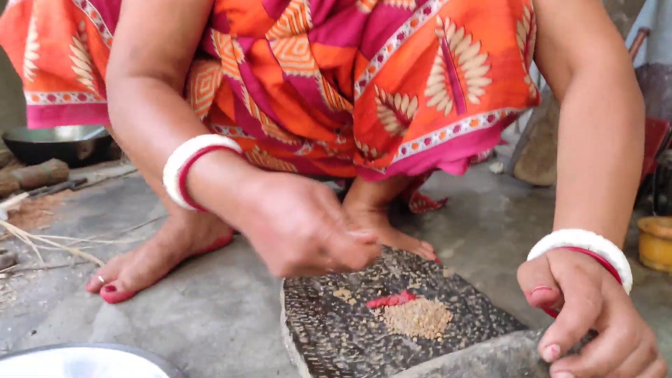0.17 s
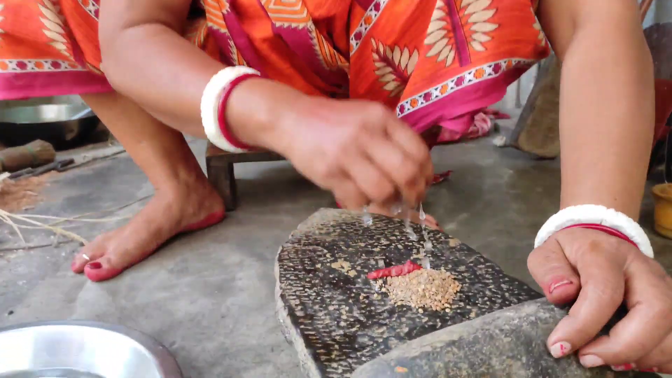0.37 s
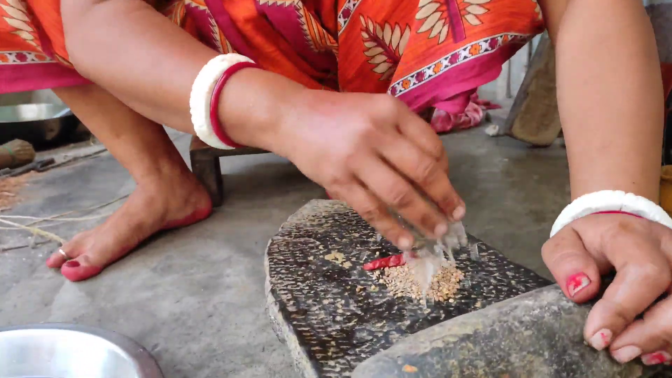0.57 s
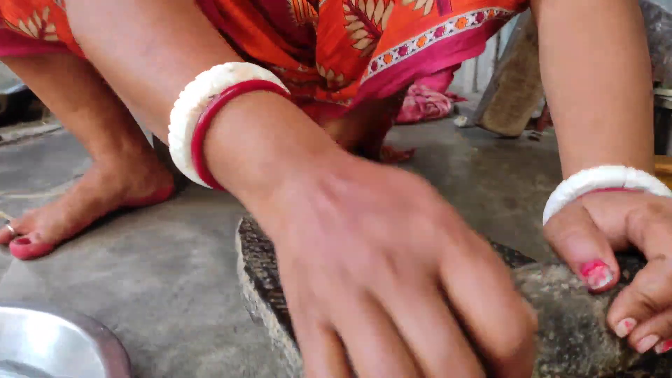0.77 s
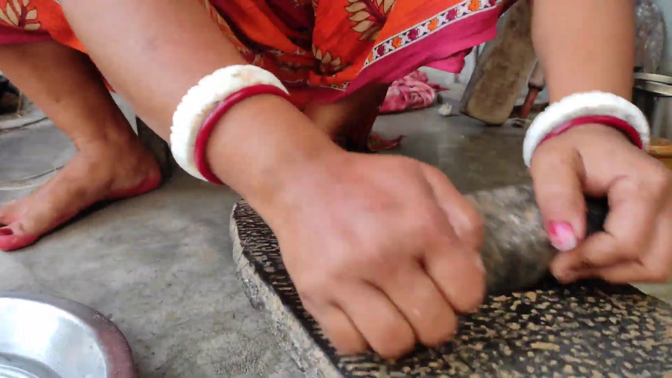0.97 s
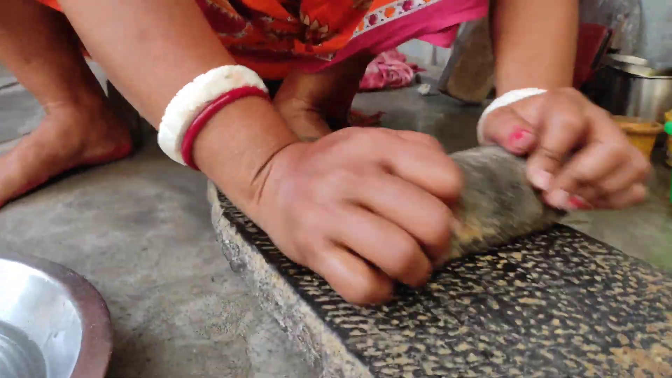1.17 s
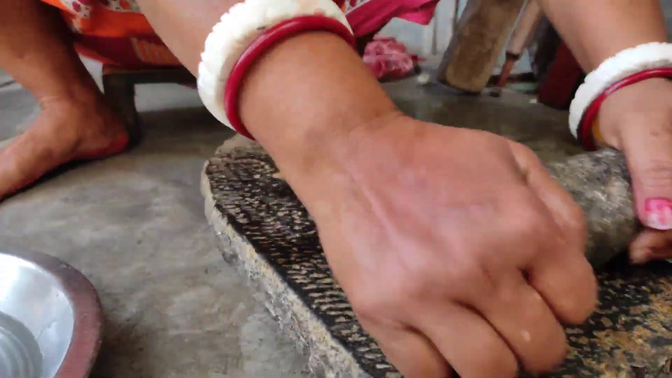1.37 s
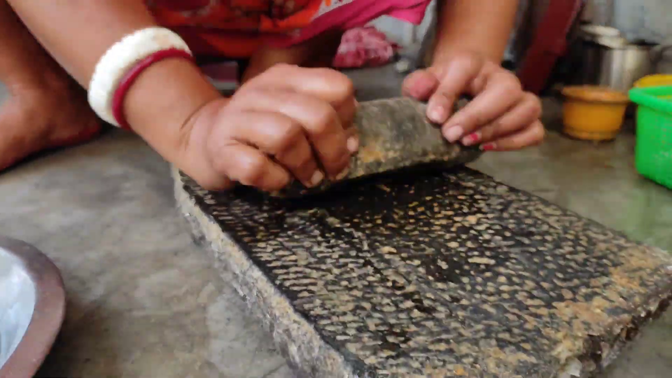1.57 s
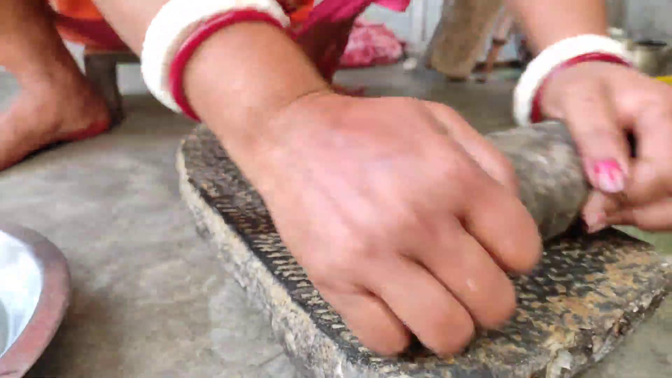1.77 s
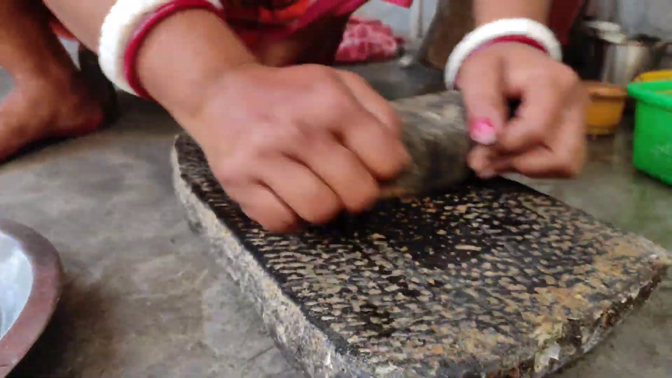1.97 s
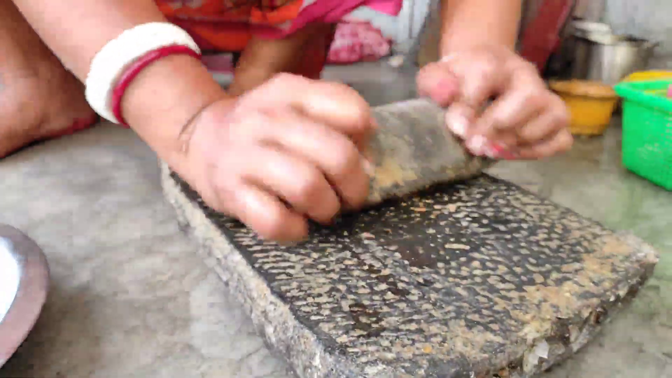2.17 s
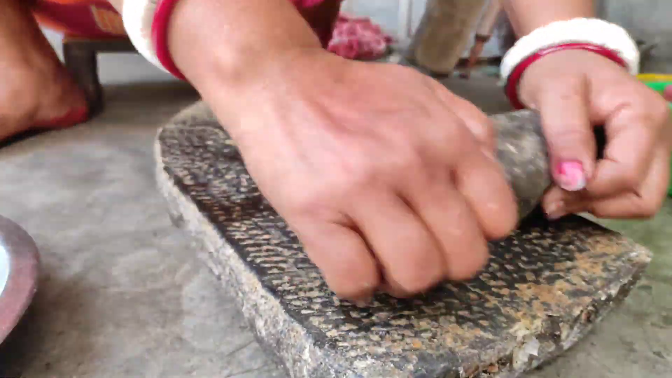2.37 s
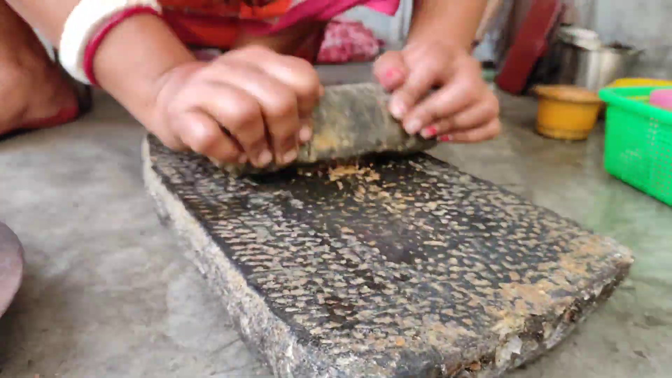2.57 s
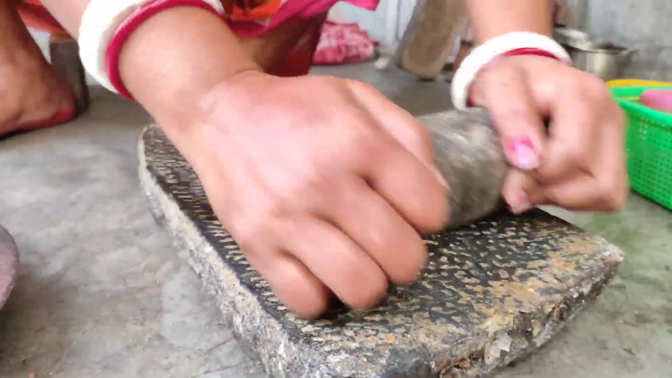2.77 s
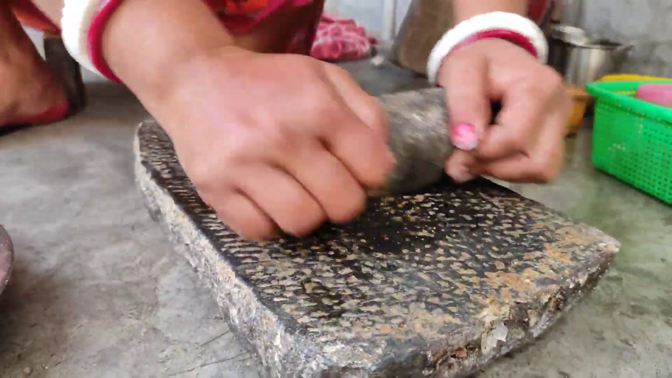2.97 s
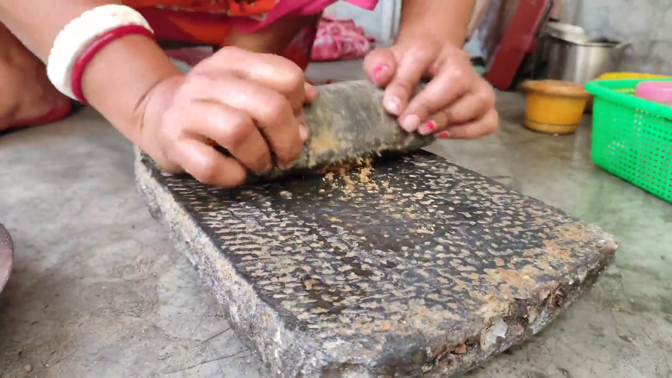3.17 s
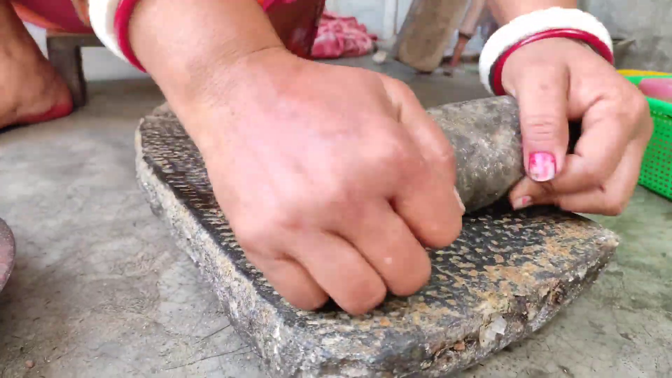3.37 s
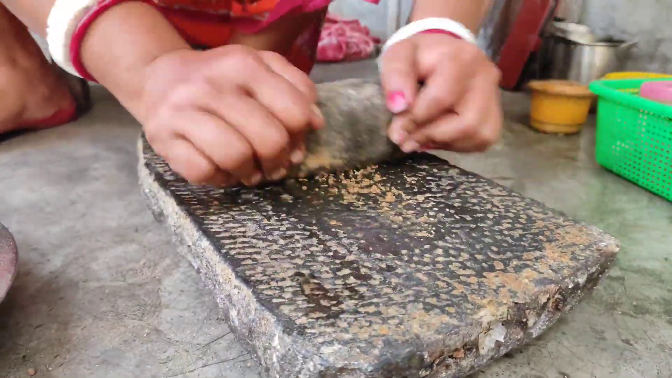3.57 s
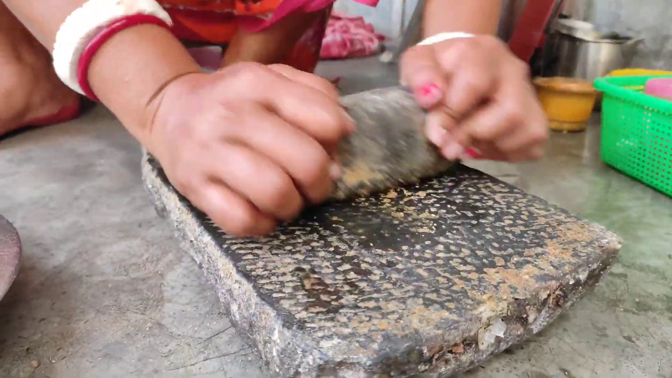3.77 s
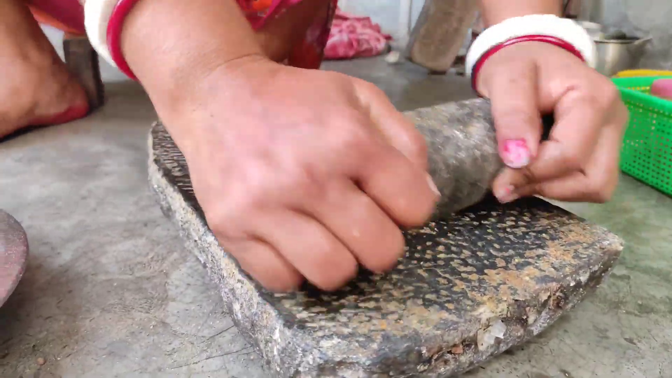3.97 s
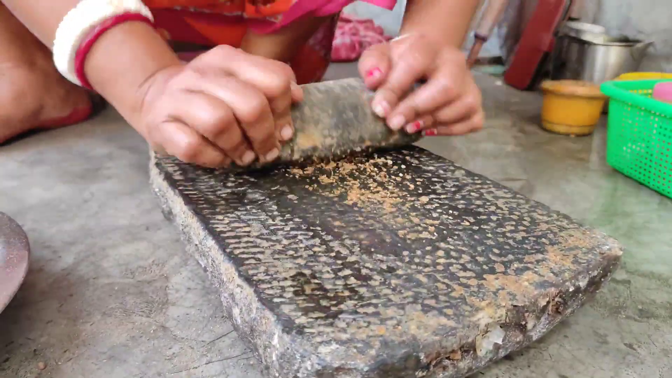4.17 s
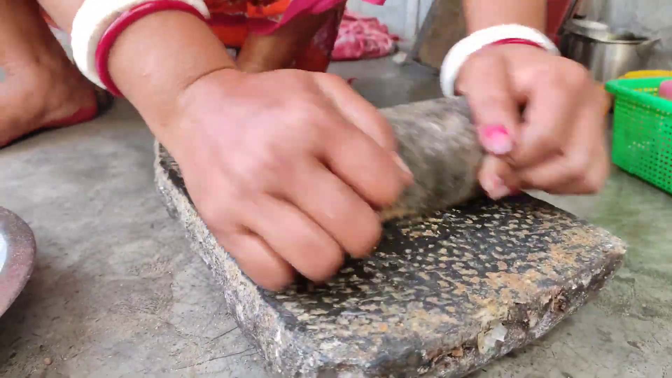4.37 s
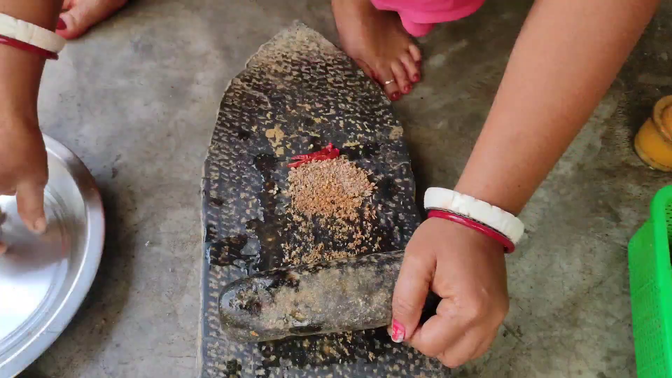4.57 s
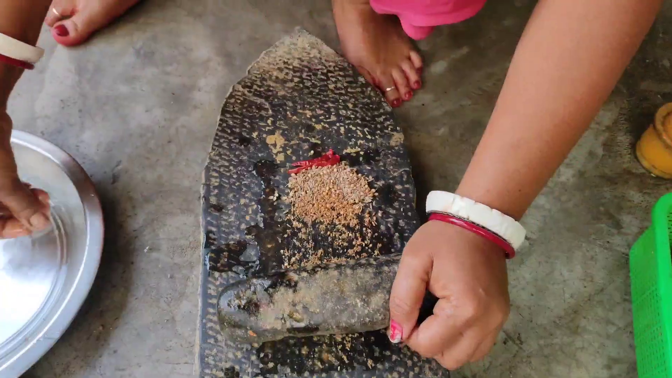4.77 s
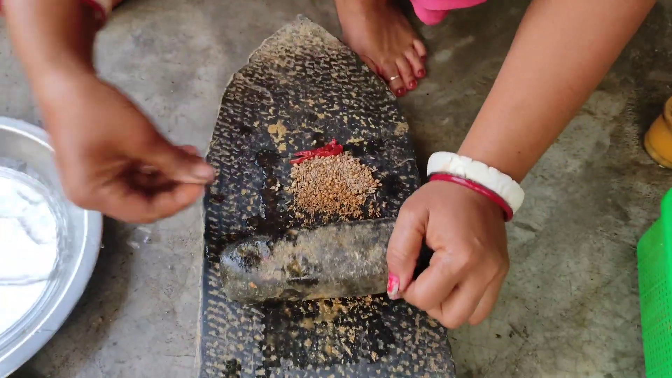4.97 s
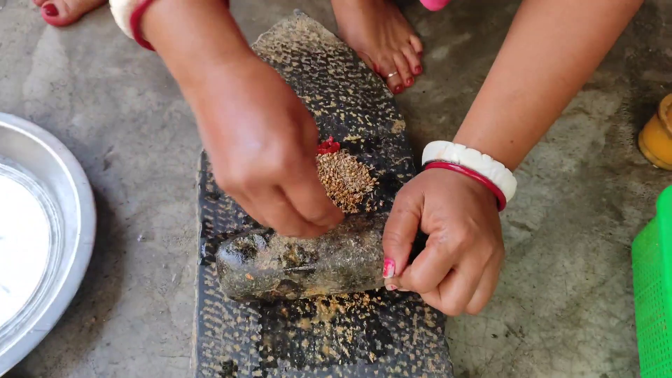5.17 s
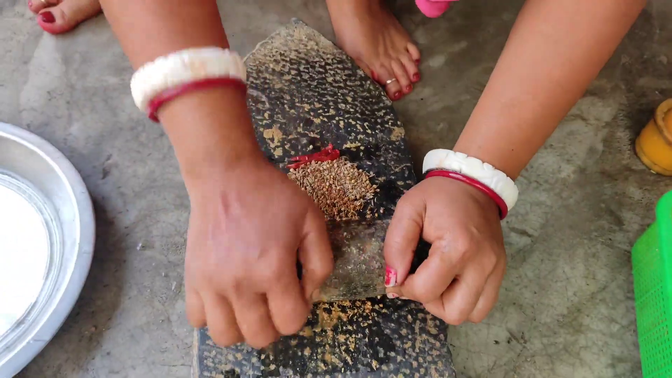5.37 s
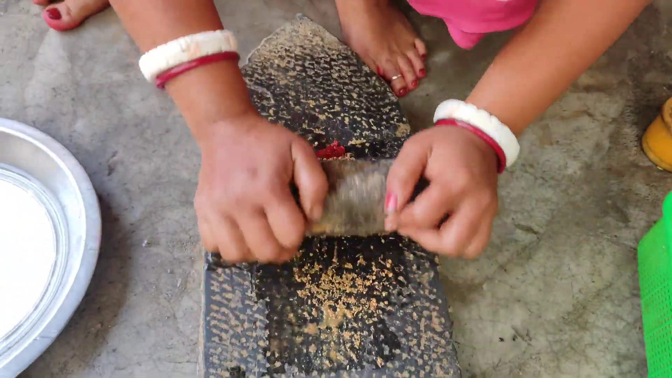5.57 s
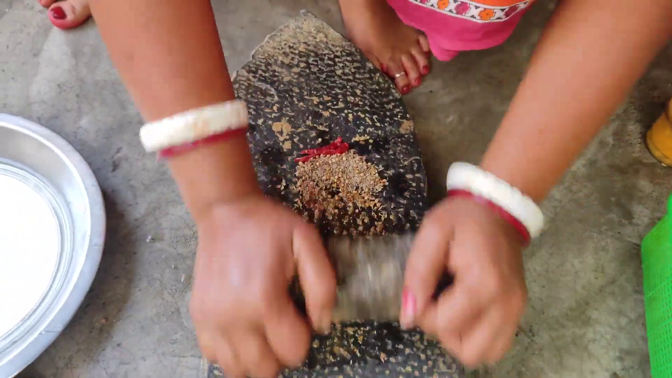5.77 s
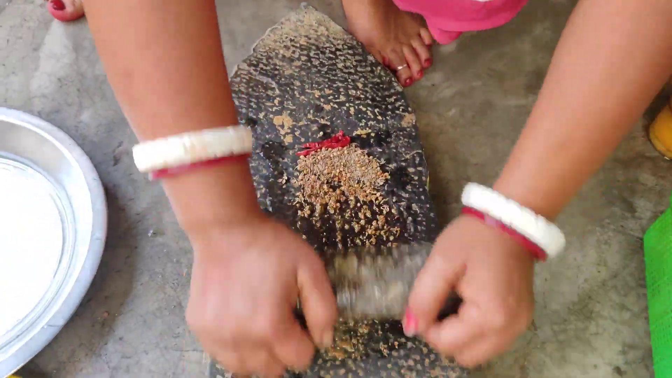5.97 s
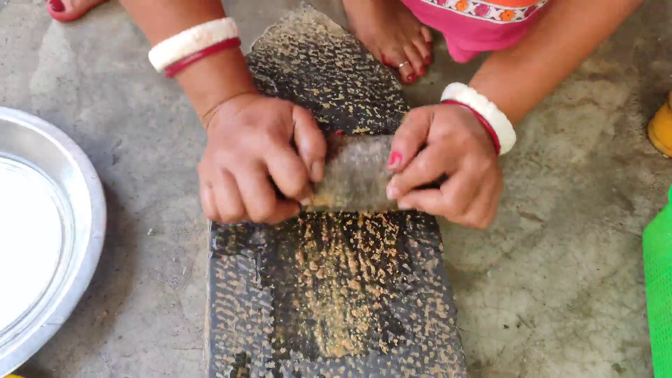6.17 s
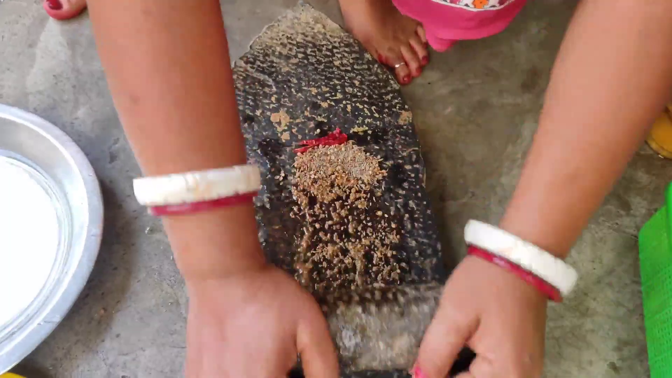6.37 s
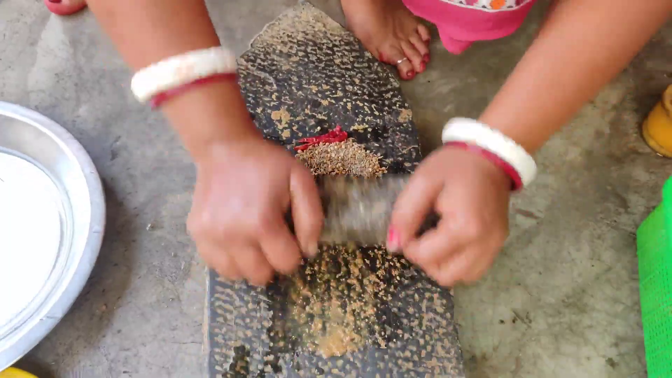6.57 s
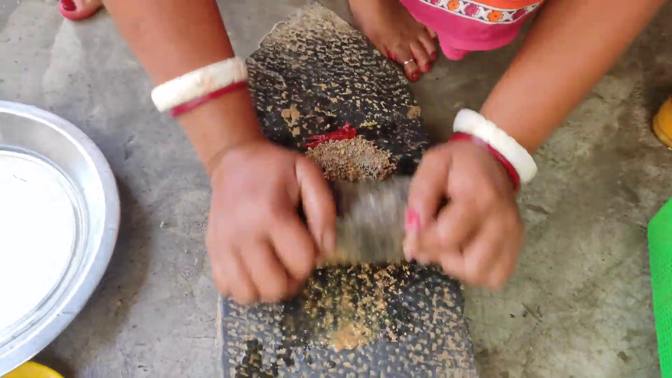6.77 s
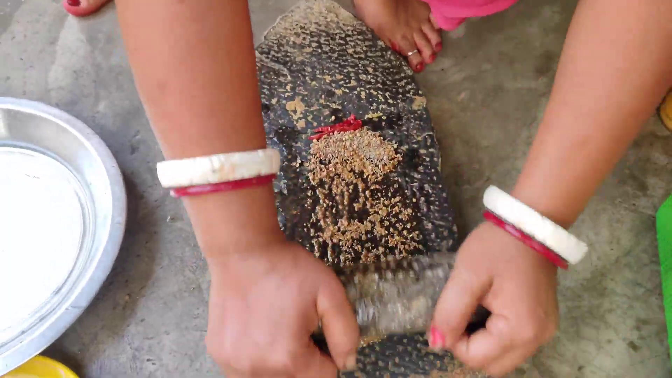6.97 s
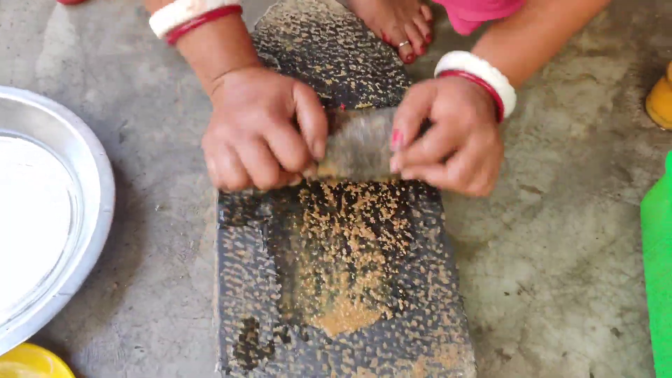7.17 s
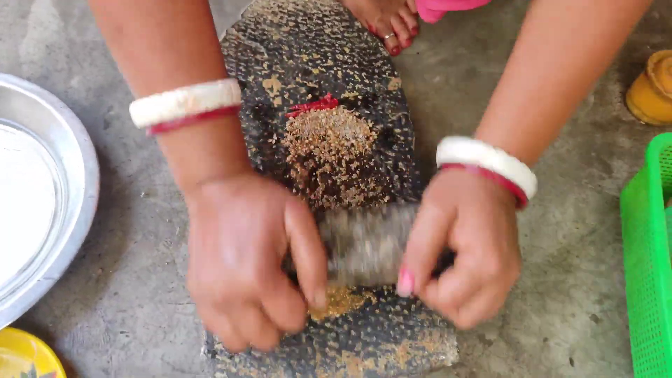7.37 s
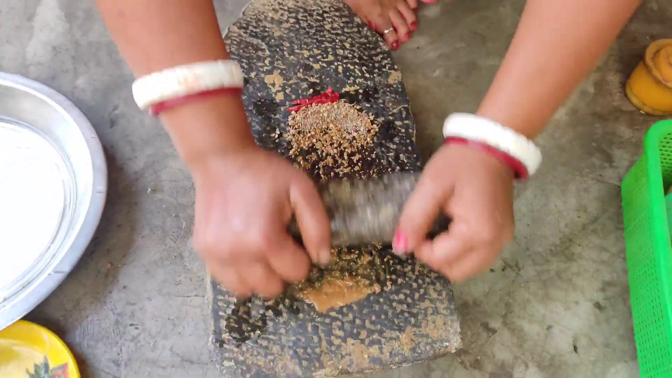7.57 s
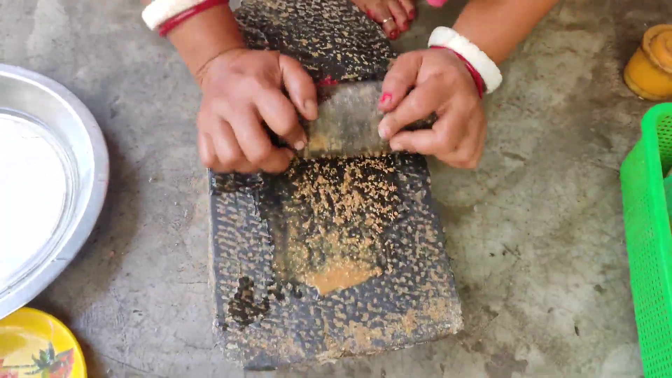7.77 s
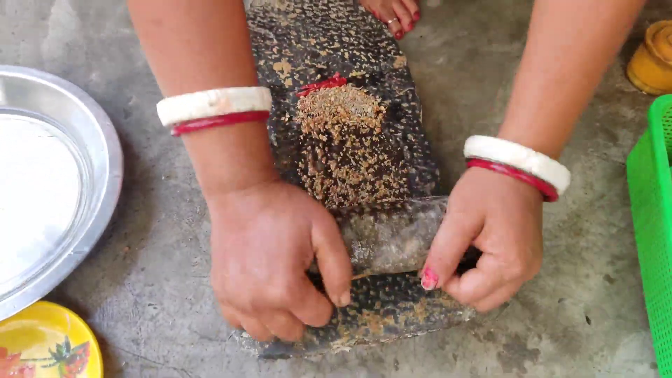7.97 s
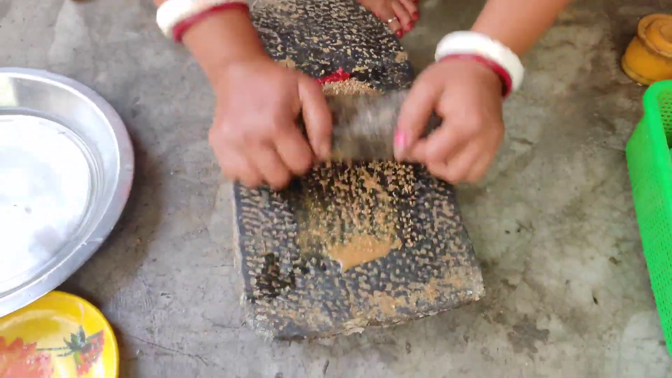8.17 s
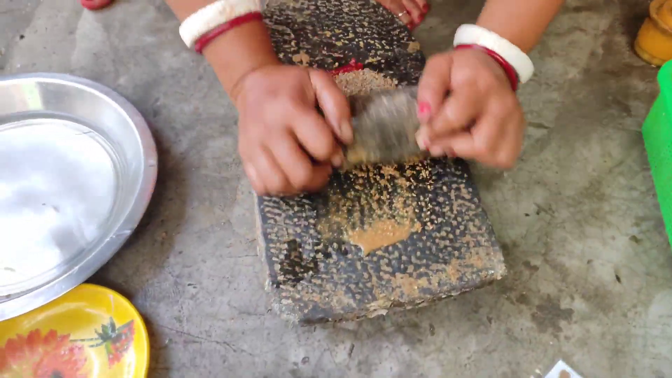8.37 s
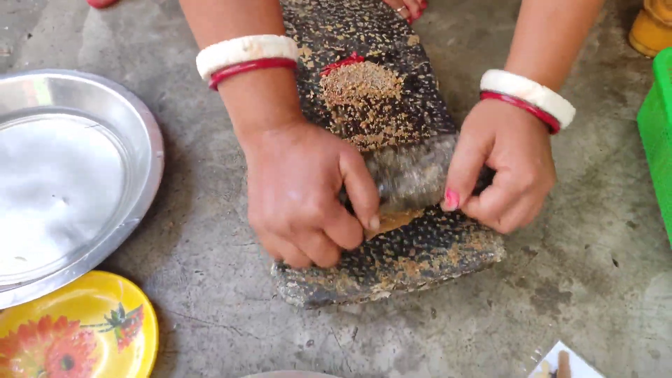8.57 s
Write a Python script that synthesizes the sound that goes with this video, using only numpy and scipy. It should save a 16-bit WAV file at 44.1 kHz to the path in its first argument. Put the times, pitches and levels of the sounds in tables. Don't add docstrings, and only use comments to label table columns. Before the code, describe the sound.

Faint room air and a few small taps fill the first 0.9 s. Then a stone roller begins rubbing over a pitted slab, rattling and rocking with hollow ringing tones near 1.2 s and hard, bright knocks around 1.35-1.45 s. From 1.6 to 4.6 s it goes back and forth, each direction lasting about a quarter second, with clacking at the turns, gritty scraping, crunching husks and sharp seed cracks, strongest near 3.4 and 4.0 s. The dry ringing fades as the knocks soften. At 4.7 s the perspective changes abruptly: quiet, small stone shifts, light water drops, and a sharp plink on a bowl at right at 5.18 s with a faint ring. From 5.55 s to the end, softer, regular grinding hisses and crunches, with crisp seed snaps around 5.86, 6.3, 7.0 and 8.1 s. Close stereo phone pickup, little reverberation.

```python
import sys
import numpy as np
from scipy import signal
from scipy.fft import rfft, irfft, next_fast_len
from scipy.io import wavfile
from scipy.ndimage import uniform_filter1d

SR = 44100
rng = np.random.default_rng(int(sys.argv[2]) if len(sys.argv) > 2 else 0)


def gain_from_db(level_db):
    decades = np.asarray(level_db, float) / 20
    return 10 ** decades


def unload_audio(sound):
    columns = np.transpose(np.atleast_2d(sound))
    steps = np.round(np.clip(columns, -1, 1) * 32767)
    wavfile.write(sys.argv[1], SR, steps.astype(np.int16))


N = 380450
T = np.arange(N) / SR
CUT_S = 4.7


def evened(x):
    return x / np.sqrt(np.mean(x ** 2) + 1e-20)


def read(points, hz):
    point_hz, value = np.transpose(points)
    return np.interp(np.log(hz + 1), np.log(point_hz + 1), value)


def add(mix, s, sound):
    part = mix[round(s * SR):][:len(sound)]
    part += sound[:len(part)]


def placed(sounds):
    out = np.zeros((2, N))
    for s, sound in sounds:
        for path in range(2):
            add(out[path], s, sound[path])
    return out


def ring(modes):
    t, out = T[:5000], 0
    for k, (hz, width_hz, db) in enumerate(modes):
        decay = np.sqrt(width_hz) * np.exp(-np.pi * width_hz * t)
        out = out + (-1) ** k * gain_from_db(db) * decay * np.sin(2 * np.pi * hz * t)
    return out


def rung(x, modes):
    return evened(signal.oaconvolve(x, ring(modes)[None], axes=1)[:, :N])


def colour(x, spectrum):
    n = x.shape[-1]
    return irfft(rfft(x) * gain_from_db(read(spectrum, np.fft.rfftfreq(n, 1 / SR))), n)


def drift(shape, over_hz, over_time):
    patches = rng.standard_normal(shape[::-1]).T
    patches = uniform_filter1d(patches, size=over_hz, axis=0)
    return evened(uniform_filter1d(patches, size=over_time, axis=1))


def room_tone():
    # hz, level_db_per_hz
    air = [(8, 10), (20, -14.5), (60, 0), (130, -14.5), (250, -13.5), (800, -17), (2400, -18),
           (3500, -26.5), (4300, -21), (5000, -14), (6100, -22), (7200, -17), (8300, -35), (14100, -31.5),
           (14500, -67)]
    # hz, extra_db in the first place
    air_first = [(30, -0.5), (120, 3), (300, -1), (600, -3.5), (1000, -0.5), (3000, 2)]
    # hz, left_right_likeness
    likeness = [(60, 0.23), (240, 0.85), (930, -0.065), (3680, 0.00072), (14500, -0.026)]
    # hz, left_minus_right_db
    air_tilt = [(60, -1.5), (240, -1.5), (930, -0.5), (3680, -7), (14500, -7.5)]
    frames, hz = N // 256 + 5, np.fft.rfftfreq(1024, 1 / SR)
    a, b, c, d = rng.standard_normal((frames, 513, 4)).T
    same, left = np.clip(read(likeness, hz), -1, 1)[:, None], a + 1j * b
    z = np.array([left, same * left + np.sqrt(1 - same ** 2) * (c + 1j * d)])
    first = np.arange(frames) * 256 / SR < CUT_S
    level_db = read(air, hz)[:, None] + read(air_first, hz)[:, None] * first
    z *= gain_from_db(level_db + 1.6 * drift((513, frames), over_hz=10, over_time=12))
    z *= gain_from_db(np.array([[.5], [-.5]]) * read(air_tilt, hz))[:, :, None]
    return gain_from_db(-55.5) * evened(signal.istft(z, nperseg=1024, noverlap=768)[1][:, :N])


def burst(db, hz, width_hz, t60_s, snap=.0, order=0, count=1):
    t = T[:6000]
    puff = rng.standard_normal((2, len(t))) * gain_from_db(-60 * t / max(t60_s, 1e-3))
    puff[:, 0] += snap
    for _ in range(count):
        puff = signal.oaconvolve(puff, ring([(hz, width_hz * count ** .5, 0)])[None, :1500], axes=1)
    puff = np.diff(puff, order, append=np.zeros((2, order)))
    return gain_from_db(db) * puff / abs(puff[0]).max()


def taps_and_scuffs():
    # hit_s, peak_db, centre_hz, width_hz, t60_s
    touches = [(0.1475, -32, 5100, 600, 0.09), (0.149, -40, 7200, 500, .05), (0.48, -39, 265, 120, 0.3),
               (.482, -50, 3600, 1800, .5), (.48, -41, 1500, 1800, 0.5), (0.636, -45, 700, 540, 0.35),
               (0.64, -50, 280, 120, .4), (2.199, -37, 240, 46, 0.35), (2.6185, -29, 860, 200, .1),
               (2.6185, -38, 2100, 400, .08), (4.772, -52, 69, 40, 0.25), (4.79, -55, 1200, 150, .12),
               (4.82, -54, 750, 100, .15), (4.955, -53, 820, 60, .15), (5.02, -50, 75, 43, 0.2),
               (5.06, -53, 1480, 60, .2), (5.07, -57, 600, 60, .15), (5.18, -48, 250, 80, .12),
               (5.187, -38, 1420, 300, 0.087), (5.246, -45, 1450, 200, 0.099), (5.32, -53, 1480, 60, .12),
               (5.476, -43, 6657, 253, 0.023), (6.089, -47, 11000, 4000, .06)]
    edges = [
        (1.2195, -30, 3300, 1500, .08),
        (1.3497, -21, 4800, 3500, .04),
        (1.362, -22, 3800, 900, .08),
        (1.8935, -22, 3000, 1500, .06),
        (1.904, -23, 3900, 900, .07),
        (2.402, -28, 2800, 1400, .05),
        (2.9195, -24, 3200, 1800, .05),
        (2.939, -28, 3500, 1200, .05),
        (4.527, -26, 3000, 1200, .05),
    ]
    murmurs = [
        (4.93, -56, 2050, 80, .25),
        (4.94, -53, 930, 90, .1),
        (4.99, -54, 2130, 80, .15),
        (4.995, -54, 850, 120, .15),
        (5.035, -54, 2130, 80, .12),
        (5.04, -54, 1480, 90, .15),
        (5.05, -55, 880, 80, .25),
        (5.07, -55, 2150, 80, .2),
    ]
    return placed([(s, burst(*shape, order=int(shape[1] > 2500), count=2))
                   for s, *shape in touches + edges + murmurs])


def grit(per_s, spread_db, lump_s, lump_db):
    size = gain_from_db(spread_db * np.minimum(rng.exponential(1, N), 4)) * rng.standard_normal((2, N))
    lumps = signal.lfilter([1], [1, -np.exp(-1 / (lump_s * SR))], rng.standard_normal(N))
    lumps = uniform_filter1d(evened(lumps), size=90)
    return size * (rng.random(N) < per_s / SR) * gain_from_db(lump_db * lumps)


def patchy(x, patch_db):
    z = signal.stft(x, nperseg=256)[2]
    z = z * gain_from_db(patch_db * drift(z.shape[1:], over_hz=4, over_time=9))
    return evened(signal.istft(z, nperseg=256)[1][:, :N])


def arch(start_s, length_s, db, crest, rise_db, fall_db, bend):
    u, crest = (T[::64] - start_s) / length_s, np.clip(crest, .05, .95)
    rise = rise_db * abs(1 - u / crest) ** bend
    fall = fall_db * abs((u - crest) / (1 - crest)) ** bend
    return gain_from_db(db + np.maximum(np.where(u < crest, rise, fall), -120))


def along(column, *extras):
    # start_s, length_s, slab_db, roller_db, seeds_db
    away = [(.93, 0.6, -42, -40, -53.5), (1.555, 0.33, -43, -38.5, -46), (2.05, 0.24, -40.5, -45.5, -57),
            (2.57, 0.24, -40.5, -49.5, -38.5), (3.09, 0.24, -38.5, -45.5, -37),
            (3.61, 0.24, -38, -50.5, -34), (4.14, 0.26, -40, -47.5, -38), (5.56, 0.23, -53.5, -44.5, -51.5),
            (6.075, 0.24, -46, -45.5, -43), (6.6, 0.26, -46, -44.5, -39), (7.12, 0.25, -45.5, -44.5, -41),
            (7.65, 0.27, -46.5, -45.5, -39.5), (8.19, .24, -48.5, -45, -42.5)]
    back = [(1.29, 0.54, -44, -54, -59), (1.79, 0.33, -35, -44, -46), (2.3, 0.3, -37, -42.5, -35),
            (2.8, 0.33, -36.5, -44.5, -29.5), (3.34, 0.3, -38, -44, -27.5), (3.86, 0.33, -39, -46, -30.5),
            (4.39, 0.34, -35, -45.5, -39.5), (5.79, 0.29, -40.5, -42, -40.5),
            (6.31, 0.3, -40.5, -40.5, -39.5), (6.855, 0.26, -40, -48, -37.5),
            (7.38, 0.26, -41.5, -43.5, -37.5), (7.91, .28, -43, -44.5, -36.5), (8.43, .29, -42, -44.5, -38)]
    # crest_share, rise_db, fall_db
    away_arch = [
        [(.4, -18, -33.5), (.6, -19, -36), (.7, -73, -12.5)],
        [(.45, -32, -23), (.75, -39.5, -1.5), (.75, -39.5, -23.5)],
    ]
    back_arch = [
        [(0.54, -30.5, -48), (0.39, -1.5, -48), (0.18, -22.5, -76.5)],
        [(0.52, -23, -50), (0.15, -47, -32), (0.36, -15.5, -39)],
    ]
    bends = [
        (2.4, 4.9, 1.87),
        (3.6, 1.85, 2),
    ]
    gain = sum(arch(*touch) for touch in extras)
    for strokes, arches in ((away, away_arch), (back, back_arch)):
        for s, length_s, *levels_db in strokes:
            place = int(s > CUT_S)
            gain = gain + arch(s, length_s, levels_db[column], *arches[place][column], bends[place][column])
    return np.interp(T, T[::64], gain)


def rubbing():
    # hz, width_hz, level_db
    rubbed_modes = [(232, 30, -6), (323, 85, -0.5), (493, 28, -6), (548.5, 15.7, 0), (720, 44, -2.5),
                    (780, 18, -0.5), (858.5, 40, 4.5), (977, 116, -1), (910, 2030, 5)]
    # hz, width_hz, level_db
    roller_modes = [(1407, 75, 6), (1490, 43.6, 13), (1788, 130, -0.5), (2190, 90, -3), (3000, 510, -43.5),
                    (3400, 40, -11)]
    # hz, level_db_per_hz
    crunch = [(1400, -15), (2300, -16.5), (2900, -9.5), (3400, -5.5), (4300, -6.5), (5300, -4.5),
              (6100, -5.5), (7200, 1), (8300, -8), (9500, -8.5), (11500, -5.5), (14100, -7), (14450, -67)]
    # hz, level_db_per_hz
    press = [(30, -38), (80, -13), (130, -5.5), (250, -13.5), (500, -10.5), (900, -27)]
    # start_s, length_s, level_db, crest_share, rise_db, fall_db, squareness
    nudge = (4.78, .37, -64, .55, -7, -10, 3.0)
    fingers = (4.88, .3, -58, .6, -14, -14, 2.2)
    smear = (4.46, .15, -36, .55, -8, -30, 3.0)
    slab = rung(grit(per_s=3000, spread_db=2.0, lump_s=0.012, lump_db=2.2), rubbed_modes)
    roller = rung(grit(per_s=1500, spread_db=1.5, lump_s=0.0012, lump_db=3.5), roller_modes)
    husks = colour(grit(per_s=8100, spread_db=0.0, lump_s=0.019, lump_db=2.5), crunch)
    floor = evened(colour(rng.standard_normal((2, N)), press))
    slab_gain = along(0, nudge)
    crush = along(2, fingers, smear) + collapses()
    load = uniform_filter1d(crush + gain_from_db(-6.5) * slab_gain, size=1500)
    out = slab * slab_gain + patchy(roller, patch_db=2.5) * along(1)
    return out + patchy(husks, patch_db=2.0) * crush + floor * gain_from_db(-20.5) * abs(load) ** 0.74


def shaken(modes, spread_db, detune, shift):
    chance = rng.standard_normal((len(modes), 2))
    return ring([(hz * shift * (1 + detune * a), width_hz, db + spread_db * b)
                 for (hz, width_hz, db), (a, b) in zip(modes, chance)])[:2500]


def knocks():
    # crest_s,
    # peak_db, hardness_db (upper modes over lower)
    blows = [(.955, -42, -8), (1.176, -20, -19), (1.207, -17.5, -13), (1.226, -15.5, -5),
             (1.616, -17, -15), (1.638, -16.5, -13.5), (1.683, -20, -2), (1.72, -16.5, -4.5),
             (2.103, -26.5, -12), (2.115, -24.5, -10), (2.176, -32, -13), (2.126, -20, -15),
             (2.158, -18, -11.5), (2.648, -20, -5), (2.657, -18, -11), (2.671, -20.5, -3),
             (3.151, -21.5, -9.5), (3.177, -26, -4.5), (3.671, -25, -5.5), (3.692, -21, -6.5),
             (4.205, -21, -10), (4.284, -25.5, -1.5),
             (1.319, -23.5, 0), (1.354, -10.5, -0.5), (1.366, -16, 2), (1.441, -8, -13.5),
                  (1.457, -21, -5), (1.473, -15, -10.5), (1.487, -26.5, -3), (1.897, -11.5, 5),
                  (1.908, -14.5, 13.5), (1.934, -10.5, -5), (1.954, -15.5, -6), (1.974, -29, 3.5),
                  (2.406, -16, 1.5), (2.42, -17.5, -5.5), (2.442, -11, -15), (2.472, -18.5, -17),
                  (2.923, -13.5, 5.5), (2.941, -14, -3.5), (2.974, -11, -10), (2.988, -26, -13),
                  (3.003, -20.5, -35), (3.508, -17.5, -13), (3.525, -26, -11), (4.013, -20, -29),
                  (4.02, -26, -14), (4.04, -18, -10), (4.051, -19, -15), (4.065, -24, -11), (4.533, -15, 5),
                  (4.553, -17.5, -9), (4.587, -26.5, 2),
             (1.625, -19.5, -15.5), (1.648, -20, -14.5), (1.672, -20.5, -14), (1.711, -24.5, -13),
               (3.501, -17, -23), (1.195, -25, -8.5), (1.378, -16.5, -3.5), (1.412, -21, -5),
               (1.432, -27.5, -5), (1.465, -22, -12), (2.505, -35, -14.5), (3.552, -38, -23),
               (3.635, -42, -21), (4.228, -39, -8), (4.256, -34, 1.5)]
    # hz, width_hz, level_db
    lower = [(476, 77, -13), (538.5, 29, -11), (651, 14, -19.5), (790, 47, -26), (828, 22, 2),
             (901.2, 14, 1), (998, 110, -7), (1062.5, 79, -7.5), (1084, 180, -11.5)]
    upper = [(1419, 82, 12), (1575, 12.5, -1.5), (1789, 51, 2.5), (2006, 137, 8.5), (2141, 13, 1),
             (2238, 80, 1.5), (2810, 270, -1.5), (3444, 89, -3), (4070, 120, -20.5)]
    grit_modes = [(2300, 130, 10.5), (3505, 54, 11.5), (4110, 145, 17.5), (5780, 190, 27),
                  (7700, 480, -12.5), (11400, 870, 14)]
    # time_s, main_ring_hz
    place = [
        (1.0, 794),
        (1.39, 902.7),
        (1.59, 841.5),
        (2.49, 871),
        (2.68, 815),
        (3.02, 881),
        (3.12, 799),
        (3.22, 857),
        (4.65, 850.6),
    ]
    rows = blows + bumps()
    out, t, times = np.zeros((2, N)), T[:1300], np.array(rows)[:, 0]
    bright = ring(grit_modes)[None, :2500]
    for s, db, hard_db in rows:
        rolled = 1.6 < s < 1.75 or 2.09 < s < 2.2
        soft = rolled or db < -27 or np.any((times < s) & (times > s - .04))
        rise_s = .005 if rolled else .0035 if soft else .0003
        chatter = rng.standard_normal((2, len(t))) * np.exp(-t / 0.017)
        contact = gain_from_db(0.5) * np.exp(-t / 0.0285) * chatter / np.linalg.norm(chatter[0]) + (t == 0)
        parts = []
        for modes, shift, damp_s in ((lower, np.interp(s, *np.transpose(place)) / 860, 0.0393),
                                     (upper, 1, 0.072)):
            struck = shaken(modes, spread_db=2.5, detune=0.008, shift=shift)[None]
            parts.append(signal.oaconvolve(contact, struck, axes=1) * np.exp(-T[:3799] / damp_s))
        parts.append(signal.oaconvolve(chatter, bright, axes=1))
        swell = 1 - np.exp(-(T[:3799] / rise_s) ** 2)
        low, high, top = (part * swell / abs(part * swell).max() for part in parts)
        blow = low + gain_from_db(hard_db - 2.0) * high + gain_from_db(0.1 * hard_db - 27.5) * top
        crest_s = .0035
        if soft:
            crest_s = np.argmax(uniform_filter1d(abs(low[0, :420 if rolled else 260]), size=60)) / SR
        for path in range(2):
            add(out[path], s - crest_s, gain_from_db(db + 3.0) * blow[path])
    return signal.lfilter(*signal.butter(2, 150 / (SR / 2), "high"), out)


def bumps():
    # start_s, length_s, first_db, last_db, hardness_db
    rattles = [(1.011, 0.062, -33, -26.5, -12.5), (1.075, 0.048, -32.5, -23.5, -13.5),
               (1.144, 0.048, -27.5, -17.5, -9.5), (1.373, 0.058, -25, -21, -6),
               (1.659, 0.091, -25.5, -31, -12.5), (2.464, 0.04, -25, -39, -10), (2.959, 0.08, -20, -36, -1),
               (3.167, 0.04, -25, -36, -13.5), (3.543, 0.029, -29.5, -63, -27),
               (3.683, 0.037, -25.5, -44, -6), (4.219, 0.035, -43, -42, 2), (4.603, 0.031, -21, -34, -14)]
    out = []
    for s, length_s, first_db, last_db, hard_db in rattles:
        for u in np.linspace(0, 1, num=4):
            a, b, c = rng.standard_normal(3)
            db = first_db + (last_db - first_db) * u
            out.append((s + length_s * u + .003 * a, db + 0.5 * b, hard_db + 0.5 * c))
    return out


def singing():
    # hz, width_hz, level_db
    sing = [(3446, 77, 0), (4200, 160, -7.5), (5800, 300, 1.5), (11600, 900, -9)]
    # start_s, length_s, level_db, crest_share
    dry_spells = [
        (1.043, 0.17, -44.5, 1),
        (1.34, .16, -45, 0.2),
        (1.596, 0.098, -42.5, 1),
        (1.886, 0.071, -48, .2),
        (2.085, 0.13, -49, .7),
        (2.4, 0.091, -52.5, .4),
        (2.64, 0.11, -53.5, 0.5),
        (2.92, 0.11, -47, 0.4),
        (3.166, 0.1, -48, 0.6),
    ]
    tone = rung(grit(per_s=2500, spread_db=3.5, lump_s=.006, lump_db=0.0), sing)
    tone = rung(tone, [(hz, 3 * width_hz, 0) for hz, width_hz, _ in sing])
    return tone * np.interp(T, T[::64], sum(arch(*row, -12.5, -15.0, 2.5) for row in dry_spells))


def rocking():
    # start_s, peak_db, pitch_hz, swell_s
    accents = [
        (1.175, -19.5, 1433, 0.0048),
        (1.202, -16.5, 1480, 0.0048),
        (1.22, -9.5, 1432, 0.0053),
        (1.315, -16.5, 1470, 0.0025),
    ]
    sounds = []
    for s, db, hz, swell_s in accents:
        u = T[:2500] / swell_s
        tone = gain_from_db(db) * (u * np.exp(1 - u)) ** 2 * np.sin(2 * np.pi * hz * T[:2500])
        sounds.append((s, [tone, tone]))
    return placed(sounds)


def collapses():
    # start_s, level_db, t60_s
    heaps = [(1.253, -35.5, 0.21), (1.743, -38.5, 0.21), (1.802, -34.5, 0.28), (2.233, -37, 0.073),
             (2.248, -40.5, 1), (2.327, -28, 0.18), (2.784, -50, 0.063), (3.215, -55, 0.14),
             (3.311, -39, 0.09), (3.7248, -61, 0.19), (3.877, -53, 0.15), (3.898, -51, 0.16),
             (4.2346, -45, 0.17), (4.43, -50.5, 0.23), (5.594, -51, 0.67), (5.724, -68, 0.086),
             (6.868, -49, 0.24), (7.239, -39, 0.05), (7.385, -54, .1), (7.419, -45, 0.088),
             (7.72, -72, 0.063), (8.46, -49, 0.13)]
    gain, t = np.zeros(N), T[:9000]
    for s, db, t60_s in heaps:
        add(gain, s, gain_from_db(db - 60 * t / max(t60_s, .01)) * np.minimum(t / 0.0092, 1))
    return gain


def cracks_and_drops():
    # hit_s, peak_db, centre_hz
    cracks = [(1.254, -25, 6200), (1.3007, -25, 6000), (1.4876, -20, 10700), (1.746, -35, 5370),
              (1.969, -27, 5500), (2.2335, -51, 7100), (2.249, -36, 6830), (2.4676, -24, 7800),
              (2.8306, -17.5, 7400), (2.976, -20.5, 10200), (3.361, -13, 7400), (3.417, -22, 7210),
              (3.442, -12, 6850), (4.404, -24.5, 11000), ]
    drops = [
        (4.8165, -48, 4700),
        (4.877, -40.5, 4900),
        (4.9217, -41, 6700),
        (4.985, -61, 9900),
        (5.0352, -38, 9200),
        (5.122, -41, 7200),
        (5.245, -38.5, 5800),
        (5.3197, -46, 5500),
    ]
    fresh = [(5.806, -34, 9000), (5.856, -21, 6750), (6.1872, -26.5, 11400), (6.3228, -17, 7700),
             (6.505, -33, 7360), (6.718, -26, 7240), (6.809, -31, 7540), (6.963, -47, 6550),
             (7.028, -21, 9300), (7.302, -29.5, 4560), (7.922, -29, 6290), (8.0837, -15.5, 10700),
             (8.6106, -24.5, 8400)]
    # hit_s, peak_db, centre_hz, width_hz, t60_s
    hard_seed = (3.9783, -11, 6800, 3500, .035)
    sounds = [(hard_seed[0], burst(*hard_seed[1:], snap=3.0, order=2))]
    for s, db, hz in cracks + drops + fresh:
        snap = burst(db + 6, hz, 11 * hz, 0.051, snap=.4, order=1)
        sounds.append((s + .0004, snap + burst(db - 35, 2200, 180, 0.022)))
    return placed(sounds)


def drip():
    # level_db, centre_hz, width_hz, t60_s, left_db
    bowl_hit = (-8, 2200, 1600, .03, -11)
    *shape, left_db = bowl_hit
    sound = burst(*shape, snap=35.0, order=1)[0]
    sound = signal.convolve(sound, np.hanning(9) / 3)
    left = gain_from_db(left_db) * uniform_filter1d(sound, size=6)
    out, hit_s = np.zeros((2, N)), 5.1829
    add(out[0], hit_s + .0004, left)
    add(out[1], hit_s, sound)
    return out


def bowl_ring():
    hz = 1250
    tone = np.sin(2 * np.pi * hz * T + 1.5 * np.sin(2 * np.pi * 7 * T))
    tone = tone + .5 * rung(rng.standard_normal((2, N)), [(hz - 20, 20, 0)])
    rise_s, hold_s, fade_s = 0.03, .29, 0.03
    return tone * gain_from_db(-62.5) * np.interp(T - 5.235, np.cumsum([0, rise_s, hold_s, fade_s]), [0, 1, 1, 0])


def ports(paths, lead, tilt, heard):
    # hz, port_likeness
    likeness = [(100, 1), (500, 0.81), (1000, 0.69), (2500, 0.2), (5000, 0.037), (14000, 0.11)]
    size = next_fast_len(N + 4096)
    hz = np.fft.rfftfreq(size, 1 / SR)
    same = np.clip(read(likeness, hz), 0, 1)
    a, b = rfft(paths, size) * gain_from_db(read(heard, hz))
    step = gain_from_db(read(tilt, hz) / 2) * np.exp(.5j * np.interp(hz, *np.transpose(lead)))
    right = (same * a + np.sqrt(1 - same ** 2) * b * 1j) / step
    return irfft(np.array([step * a, right]), size)[:, :N]


def scene():
    # hz, left_lead_rad
    leads = [
        [(0, 0), (900, .4), (1450, 1.6), (1810, 2.6), (2070, 5.9), (2760, 6.1), (3450, 8.9), (14700, 42)],
        [(0, 0), (700, .5), (1600, 2.2), (2700, 7), (14700, 15)],
    ]
    # hz, left_minus_right_db
    tilts = [
        [(60, -1), (180, -0.5), (540, -3.5), (1620, 1.5), (4840, -2), (14500, -1)],
        [(60, 1), (180, -1), (540, 0), (1620, -1.5), (4840, -4), (14500, -2.5)],
    ]
    # hz, level_db
    heard = [
        [(100, -3.5), (300, -1.5), (8000, -2), (12000, -1.5)],
        [(100, -5), (300, -2), (8000, 1.5), (12000, -2.5)],
    ]
    near = taps_and_scuffs() + rubbing() + knocks() + singing() + rocking() + cracks_and_drops() + bowl_ring()
    first = np.clip((CUT_S - T) / 0.022 + .5, 0, 1)
    stone = ports(near * first, leads[0], tilts[0], heard[0])
    stone = stone + ports(near * (1 - first), leads[1], tilts[1], heard[1])
    return room_tone() + stone + drip()


def starved(x):
    # hz, dropout_rarity_sigmas
    rarity = [(1800, 3.4), (2700, 1.7), (4300, 1.9), (5200, 2.7), (7400, 2.7), (8400, 1.6), (10000, 1.7),
              (14000, 1.8)]
    hz, _, z = signal.stft(x, SR, nperseg=1024, noverlap=768)
    power = uniform_filter1d((abs(z) ** 2).sum(0), size=9, axis=0)
    level_db = 10 * np.log10(uniform_filter1d(power, size=5, axis=1) + 1e-16)
    under_db = level_db[10:].max(0) - level_db - 22
    patches = drift(z.shape[1:], over_hz=6, over_time=11)
    lost = patches > read(rarity, hz)[:, None] - .055 * np.maximum(under_db, 0)
    return signal.istft(z * gain_from_db(-30 * lost), SR, nperseg=1024, noverlap=768)[1][:, :N]


def band_limit(x):
    return signal.sosfilt(signal.butter(12, 15120, fs=SR, output="sos"), x)


def record(dry):
    shelf, edge = (signal.firwin(255, hz, window=("kaiser", 6), fs=SR) for hz in (14350, 16300))
    shelved = signal.oaconvolve(dry, (shelf + gain_from_db(-26) * (edge - shelf))[None], "same")
    ceiling = 1.05
    mix = ceiling * np.tanh(starved(shelved) / ceiling)
    return band_limit(mix)


dry = scene()
out = record(dry)
unload_audio(out)
```